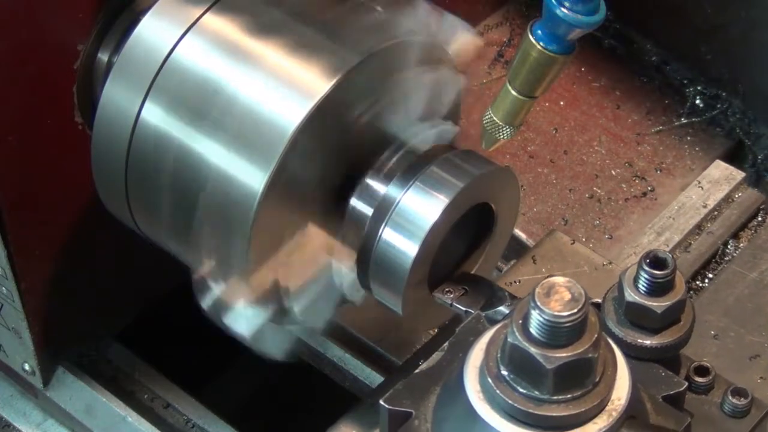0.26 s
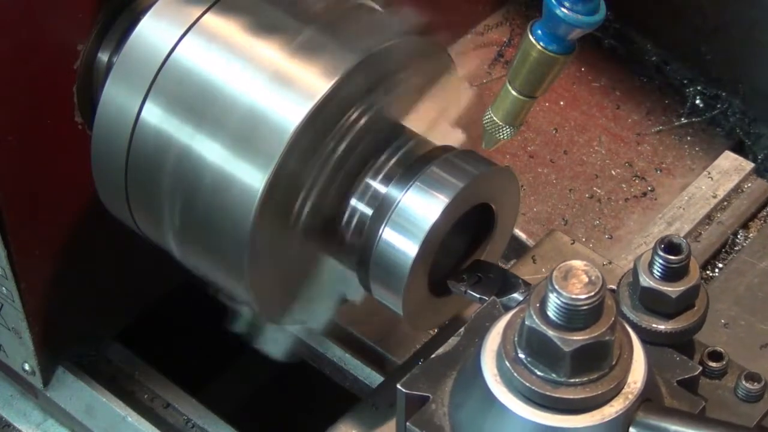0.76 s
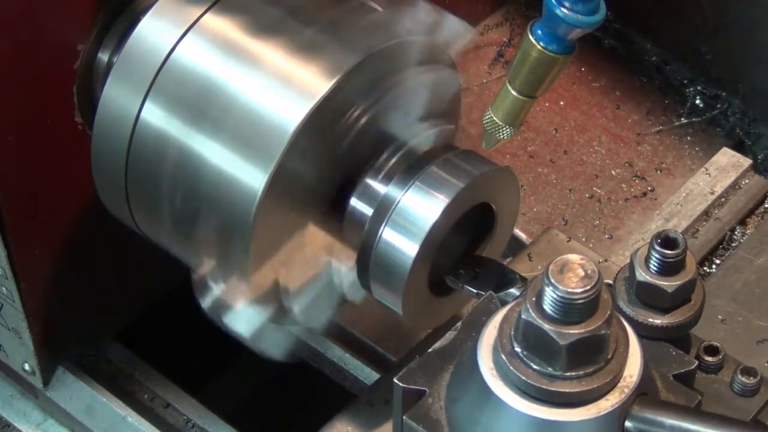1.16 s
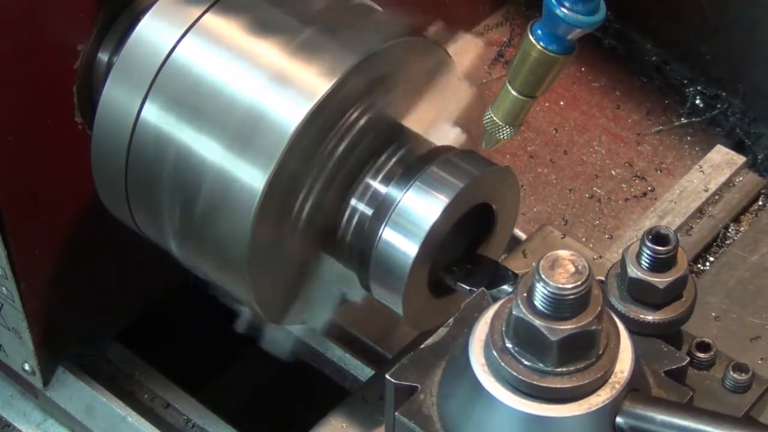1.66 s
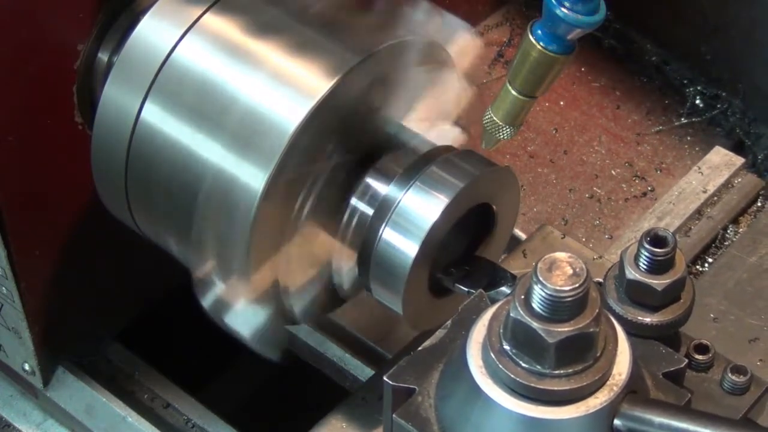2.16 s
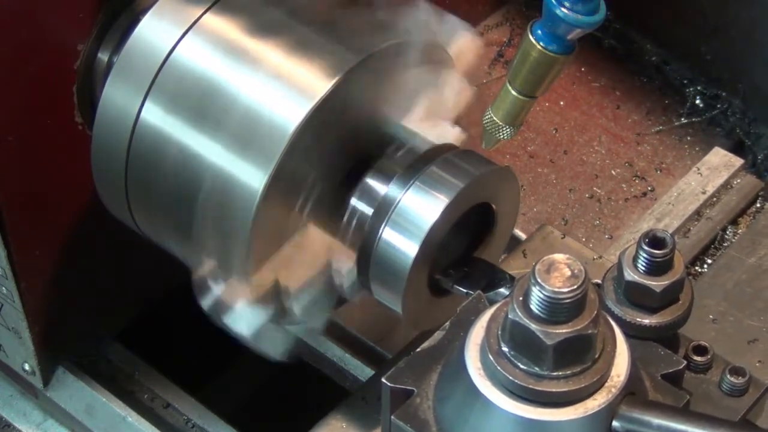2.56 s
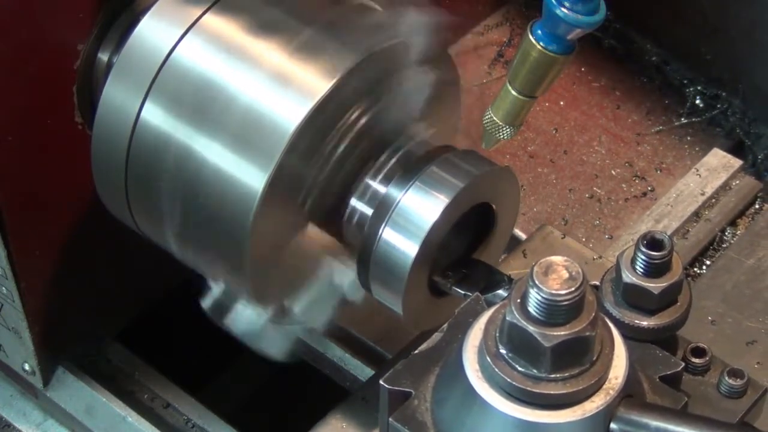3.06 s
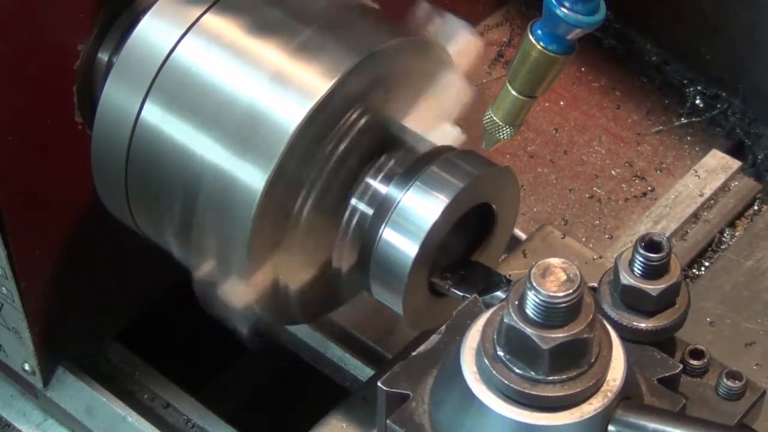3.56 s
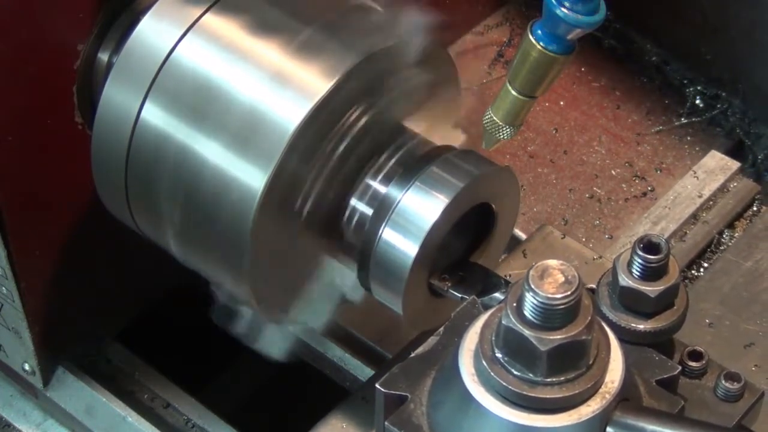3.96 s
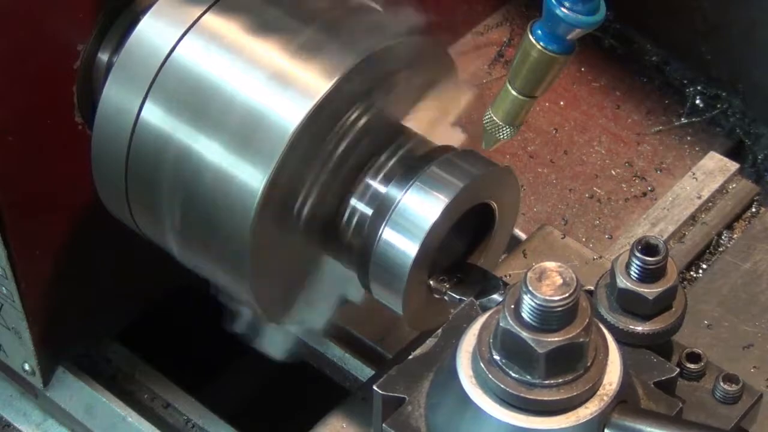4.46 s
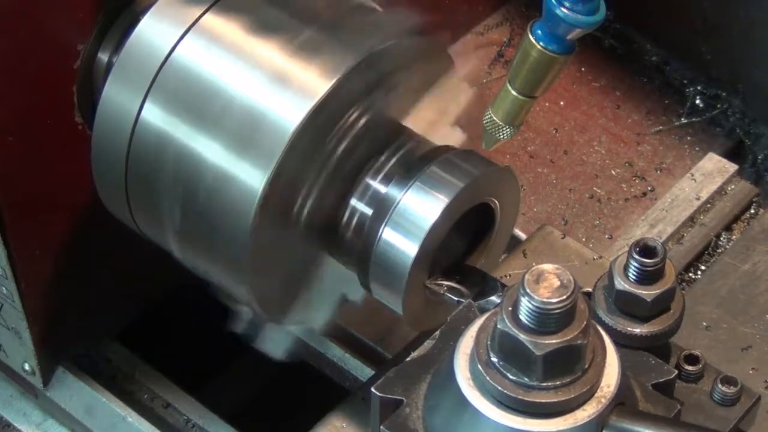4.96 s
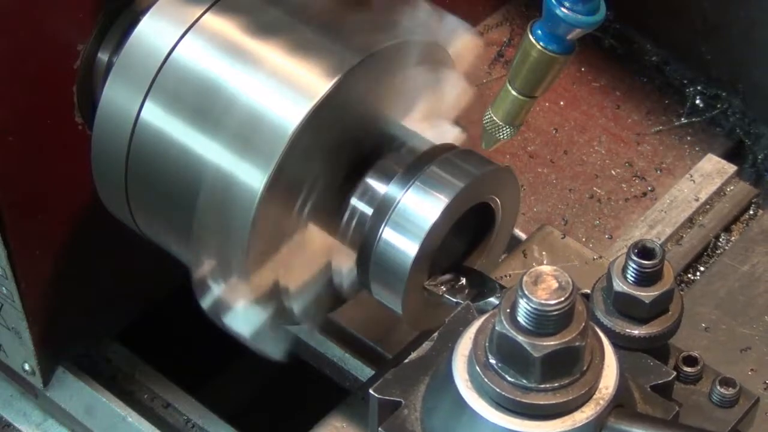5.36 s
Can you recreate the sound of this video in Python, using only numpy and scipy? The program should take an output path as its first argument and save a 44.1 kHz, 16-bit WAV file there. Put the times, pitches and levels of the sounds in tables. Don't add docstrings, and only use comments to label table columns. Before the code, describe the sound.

Steady bright air hiss over a humming lathe drive, faint thin whine, then the boring tool bites and squeals piercingly in bursts.

```python
import sys
import numpy as np
from scipy import signal
from scipy.fft import rfft, irfft, next_fast_len
from scipy.io import wavfile
from scipy.ndimage import uniform_filter1d, map_coordinates

SR = 44100
rng = np.random.default_rng(int(sys.argv[2]) if len(sys.argv) > 2 else 0)


def generate_wav(signal):
    frames = np.transpose(np.atleast_2d(signal))
    scaled = np.clip(frames, -1, 1) * 32767
    pcm = np.round(scaled).astype(np.int16)
    wavfile.write(sys.argv[1], SR, pcm)


def gain_from_decibels(decibels):
    exponent = np.asarray(decibels, float) / 20
    return 10 ** exponent


N = 247401
TIME = np.arange(N) / SR
BITE_S, TOUCH_S = 4.2, 0.14


def unit(x):
    return x / np.sqrt(np.mean(x ** 2) + 1e-20)


def along(points, hz):
    f, v = np.transpose(points)
    return np.interp(np.log(hz + 1), np.log(f + 1), v)


def curve(rows):
    return np.interp(TIME, *np.transpose(rows))


def ramp(start_s, length_s):
    return np.clip((TIME - start_s) / length_s, 0, 1)


def wobble(rate):
    points = rng.standard_normal(int(N * rate / SR) + 4)
    return map_coordinates(points, [TIME * rate])


def tone(hz):
    turns = np.cumsum(hz) / SR + rng.random()
    return np.sqrt(2) * np.sin(2 * np.pi * turns)


def patches(shape, across, long):
    field = uniform_filter1d(rng.standard_normal(shape), across, 0)
    return unit(uniform_filter1d(field, long, 1))


# (frequency [Hz], left minus right [dB])
LEAN = [(60, 1), (130, 1), (250, -4), (450, -3), (620, 1), (1000, 0), (4500, 0), (5800, -3), (7500, 0)]


def stereo(pair, colour_db, side):
    m = next_fast_len(N + 8192)
    hz = np.fft.rfftfreq(m, 1 / SR)
    side_db = np.array([0 * hz, along(side, hz)])
    mid, wide = rfft(pair, m) * gain_from_decibels(colour_db(hz) + side_db)
    wide = wide + mid * np.tanh(along(LEAN, hz) * np.log(10) / 40)
    mid, wide = irfft([mid, wide], m)[:, :N]
    return np.array([mid + wide, mid - wide]) / np.std(mid)


# (time [s], peak level [dB], pitch [Hz])
THUDS = [
    (0.995, -68, 139),
    (1.25, -65, 109),
    (1.655, -70, 92),
    (3.269, -71, 83.4),
]


def shop():
    out = np.zeros(N)
    for start_s, db, hz in THUDS:
        age = np.clip(TIME - start_s, 0, None)
        swell = 1 - np.exp(-age / 0.016)
        out += gain_from_decibels(db - 60 * age / .5) * swell * np.sin(2 * np.pi * hz * age)
    return out * gain_from_decibels([[2], [-2]])


SAG, SAG_S, SETTLE, SETTLE_S = .024, .13, .013, .3


def spindle():
    since = np.clip(TIME - BITE_S - SAG_S, 0, None)
    loss = SETTLE + (SAG - SETTLE) * np.exp(-(since / SETTLE_S) ** 2)
    return 1 - ramp(BITE_S, SAG_S) * loss


# (frequency [Hz], level [dB per Hz])
DRIVE_RUMBLE = [(13, -57), (22, -16.5), (91, -19), (261, -12), (307, -4.5), (361, -5), (412, 0.5),
                (544, -5.5), (631, -2), (696, -11), (806, -5.5), (997, -14.5), (1100, -8.5), (1430, -55),
                (2420, -120)]
# (frequency [Hz], side minus mid [dB])
DRIVE_SIDE = [(25, 7), (60, 9), (110, 4), (200, -4), (380, -15), (700, -12), (1100, -8)]
# (multiple of shaft speed, level [dB rms], change under load [dB])
TEETH = [(8, -84, 1), (14, -80, -4), (20, -75, -6), (22, -79, 3), (23, -69, -5), (24, -69, 3),
         (25, -78, -1), (26, -73, 3), (30, -79, -3), (32, -76, -6), (34, -68, -11), (36, -67, 0),
         (38, -79, -1)]
# (idle pitch [Hz], level [dB rms], change under load [dB])
BELT = [(95.9, -88, -1), (191.9, -80, -7), (314.2, -76, 3), (319.6, -74, 1), (417.0, -68, -2),
        (468.5, -75, 1), (475.1, -76, 3), (481.9, -77, 3), (509.1, -76, -9), (514.6, -79, 2),
        (730.9, -79, -7), (775.9, -79, 1)]
# (frequency [Hz], left minus right [dB])
DRIVE_PAN = [(96, 5), (192, 4), (250, -2), (320, -3), (480, -3), (530, -1), (600, 3), (720, 1)]
SHAFT_HZ = 17.663
WHINE_HZ, WHINE_DB, FEED_S, FEED_DROP_DB = 926.2, -71, 1.6, 7.5


def drive(shudder):
    speed = spindle()
    load = np.clip((1 - speed) * 75, 0, 1)

    rumble = stereo(rng.standard_normal((2, N)), lambda f: along(DRIVE_RUMBLE, f), DRIVE_SIDE)
    out = gain_from_decibels(-60.5 + shudder + 1.5 * wobble(3.98)) * rumble

    whine_db = WHINE_DB - FEED_DROP_DB * ramp(FEED_S - .2, .4) - 12 * load + wobble(5)
    out += gain_from_decibels(whine_db) * tone(WHINE_HZ * speed)

    shaft = [(k * SHAFT_HZ, db, load_db) for k, db, load_db in TEETH]
    for hz, db, load_db in sorted(shaft + BELT):
        level_db = db - .6 + load * load_db + .5 * shudder + (.9 + load) * wobble(6)
        pitch = hz * (speed + (.0003 + .001 * load) * wobble(4))
        pan_db = along(DRIVE_PAN, hz)
        out += gain_from_decibels([[pan_db / 2], [-pan_db / 2]]) * gain_from_decibels(level_db) * tone(pitch)
    return out


# (frequency [Hz], level [dB per Hz])
JET = [(700, -40), (900, -28.4), (1300, -39.5), (1900, -15.4), (2800, -15.5), (4000, -23.0), (5400, -13.3),
       (6600, 0.0), (7600, -8.1), (8800, -11.6), (10000, -23.7), (12000, -28.5), (14000, -29.4),
       (15700, -36.5)]
# (frequency [Hz], side minus mid [dB])
JET_SIDE = [(1000, -24.5), (3000, -17.5), (4500, -28.5), (6000, -12.5), (8000, -20), (8600, -20),
            (9400, -22), (10500, -16), (15000, -28.5)]
# (frequency [Hz],
# width [Hz], level [dB])
STEEL = [(1001, 30, -2.9), (1097, 122, 5.6), (1261, 164, 12.0), (1318, 30, -2.4), (1403, 227, 12.0),
         (1405, 54, -6.9), (1492, 68, -1.8), (1582, 71, 3.8), (1651, 30, -1.7), (1704, 55, 3.2),
         (1864, 96, 12.0), (1888, 151, -12.9), (2054, 30, -5.5), (2160, 66, 6.8), (2357, 100, 12.0),
         (2438, 499, -12.9), (2595, 152, 12.0), (2677, 146, -10.4), (2884, 87, 9.8), (2907, 110, -10.3),
         (2993, 111, 4.5), (3129, 82, 7.7), (3313, 48, -2.9), (3526, 85, 5.4), (3628, 30, -4.2),
         (3669, 30, 2.6), (3841, 355, 9.1), (5176, 41, 3.8), (5496, 500, -6.4),
         (6199, 247, -11.3), (6558, 60, -6.0), (6669, 341, -14.0), (6933, 103, -4.9), (7465, 208, -6.5),
        (7520, 100, 6.7), (8244, 115, 2.7), (9087, 88, -2.7), (10154, 135, 6.1), (10959, 48, 3.4),
        (11686, 137, 6.1), (12047, 234, 7.0), (12689, 419, 4.4), (14277, 252, 4.2), (14887, 261, 3.5)]
# (frequency [Hz], once a jaw [dB], twice a jaw [dB])
JAWS = [(2000, .3, -.6), (3700, .25, -.35), (5000, .25, .9), (7000, -.1, .6), (8200, -1.3, .3),
        (9500, 1.2, .5), (11200, .1, -.6), (13000, 1.7, .45)]
# (time [s], level [dB])
FLOW = [
    (0, -33),
    (2, -33.5),
    (4.2, -32.5),
    (5.25, -33),
    (5.61, -31),
]
JAW_HZ = 36.7
SHADE_DB_PER_S = 1.2


def mist(shudder):
    hz, s, z = signal.stft(rng.standard_normal((2, N)), SR, nperseg=128)
    passes = np.interp(s, TIME, np.cumsum(JAW_HZ * spindle()) / SR)
    at, once, twice = np.transpose(JAWS)
    flutter_db = np.outer(np.interp(hz, at, once), np.cos(2 * np.pi * passes))
    flutter_db += np.outer(np.interp(hz, at, twice), np.cos(4 * np.pi * passes))
    flutter_db = 1.45 * flutter_db + .7 * (hz[:, None] > 10000) * np.cos(6 * np.pi * passes)
    shake = along([(1000, 0.68), (4000, 0.48), (6000, 0.37)], hz)
    flutter_db += shake[:, None] * np.interp(s, TIME, shudder)
    flutter_db -= (hz[:, None] > 5500) * SHADE_DB_PER_S * np.clip(s - BITE_S, 0, None)
    spray_db = 0.58 * patches(z.shape[1:], 3, 40) + .5 * patches(z.shape[1:], 9, 8)
    pair = signal.istft(z * gain_from_decibels(flutter_db + spray_db), SR, nperseg=128)[1][:, :N]

    clutter = unit(uniform_filter1d(rng.standard_normal(SR // 2 + 1), size=40))

    def colour(f):
        ripple = 1.2 * np.interp(f, np.arange(len(clutter)), clutter)
        modes = sum(db / (1 + (2 * (f - c) / w) ** 2) for c, w, db in STEEL)
        return along([(300, -94)] + JET, f) - 1.15 * (f < 1050) + modes + ripple

    return gain_from_decibels(curve(FLOW) + 0.12 * wobble(6.7)) * stereo(pair, colour, JET_SIDE)


# (catches [s], lets go [s], first level [dB], last level [dB])
SQUEAL = [(4.25, 4.258, -39, -39), (4.344, 4.368, -33, -33), (4.42, 4.535, -31.5, -29),
          (4.535, 4.595, -29.5, -38), (4.606, 4.647, -30.5, -33), (4.697, 4.745, -45, -44),
          (4.762, 4.835, -30, -35.5), (4.879, 5.0, -30, -31.5), (5.0, 5.16, -31, -29.5),
          (5.2, 5.217, -39, -40), (5.263, 5.378, -30.5, -28), (5.423, 5.65, -28.5, -26.5)]
GROW_DB_PER_S, DIE_DB_PER_S = 820, 780


def chatter_db():
    def knee(db):
        return 1 / (1 + gain_from_decibels(2 * np.clip(db, -60, 90)))

    power = 0
    for catch_s, free_s, first, last in SQUEAL:
        held = gain_from_decibels(2 * np.interp(TIME, [catch_s, free_s], [first, last]))
        grow = knee(GROW_DB_PER_S * (catch_s - TIME))
        die = knee(DIE_DB_PER_S * (TIME - free_s))
        power = power + held * grow * die
    return 10 * np.log10(power)


# (frequency [Hz], level [dB per Hz])
CHIP = [(150, -30), (250, -12.5), (340, -8.5), (450, -3.5), (560, -21), (900, -17.5), (2000, -13),
        (3200, -3), (4600, -2), (6000, -25), (9000, -60)]
# (frequency [Hz], side minus mid [dB])
CHIP_SIDE = [(200, -10), (500, -20), (1000, -22), (5000, -20)]
SQUEAL_HZ, DROOP_HZ_PER_S = 4800, 4
POST_HZ, POST_DROOP_HZ_PER_S = 912, 15
GROAN_DB, GROAN_PEAK_S, GROAN_RISE_DB_PER_S, GROAN_FALL_DB_PER_S = -68, 5.32, 11, 24
CHIP_DB, CHIP_LIFT_DB, GROAN_LIFT_DB, LIFT_S = -45.5, 5.5, 4.5, .07


def tool():
    db = chatter_db()
    since_bite = TIME - BITE_S
    hz = SQUEAL_HZ - DROOP_HZ_PER_S * since_bite + 1.3 * np.clip(-30 - db, 0, 15) + 2 * wobble(60)
    phase = 2 * np.pi * np.cumsum(hz) / SR
    swing = gain_from_decibels(db + .6 * wobble(45) + .7 * wobble(130))
    squeal = np.sqrt(2) * swing * (np.sin(phase) + gain_from_decibels(-26.0) * np.sin(2 * phase))

    clear = uniform_filter1d(gain_from_decibels(db - db.max()), int(LIFT_S * SR))

    groan_db = GROAN_DB - GROAN_RISE_DB_PER_S * np.clip(GROAN_PEAK_S - TIME, 0, None)
    groan_db -= GROAN_FALL_DB_PER_S * np.clip(TIME - GROAN_PEAK_S, 0, None)
    groan_db += wobble(8) - GROAN_LIFT_DB * clear
    groan = ramp(BITE_S, .5) * gain_from_decibels(groan_db) * tone(146 + wobble(6))

    cutting = ramp(BITE_S - TOUCH_S, TOUCH_S) ** 2
    chip_db = CHIP_DB - CHIP_LIFT_DB * clear + 1.4 * wobble(14)
    chip_noise = stereo(rng.standard_normal((2, N)), lambda f: along(CHIP, f), CHIP_SIDE)
    chips = cutting * gain_from_decibels(chip_db) * chip_noise

    post_db = -71 + 6 * (TIME - 4.8) + .6 * wobble(5)
    post_hz = POST_HZ - POST_DROOP_HZ_PER_S * since_bite + wobble(6)
    post = ramp(BITE_S + .2, .5) * gain_from_decibels(post_db) * tone(post_hz)
    return squeal * gain_from_decibels([[1.1], [-1.1]]) + groan + chips + post


def scene():
    shudder = 0.66 * wobble(9) + 1.56 * wobble(22.11)
    return shop() + drive(shudder) + mist(shudder) + tool()


def roll_off(x):
    return signal.sosfilt(signal.butter(12, 15870, fs=SR, output="sos"), x)


def record(dry):
    power = signal.lfilter([.003], [1, .003 - 1], np.mean(dry, 0) ** 2, zi=[4e-4])[0]
    over_db = 10 * np.log10(power + 1e-12) + 32.98
    slow_db = uniform_filter1d(over_db, size=700)
    held = dry * gain_from_decibels(-.61 * slow_db)
    held = held / (1 + np.abs(held / .092) ** 5) ** (1 / 5)
    passed = np.fft.rfftfreq(N, 1 / SR) < 15760
    mix = irfft(rfft(held) * passed, N)
    return roll_off(mix)


dry = scene()
out = record(dry)
generate_wav(out)
```